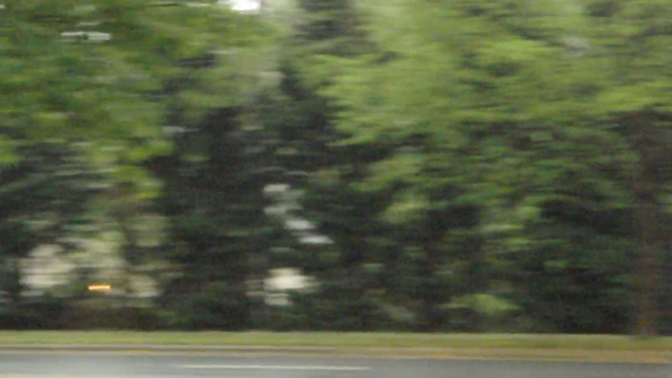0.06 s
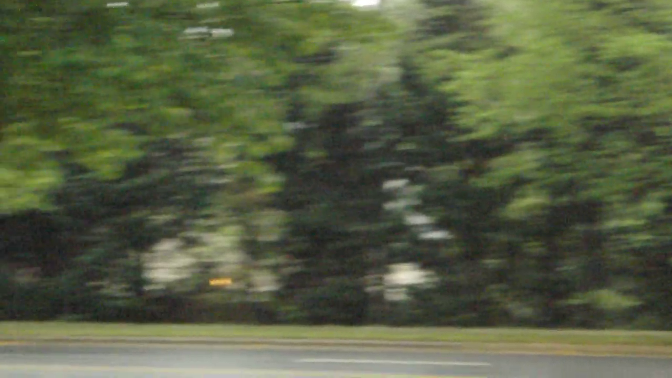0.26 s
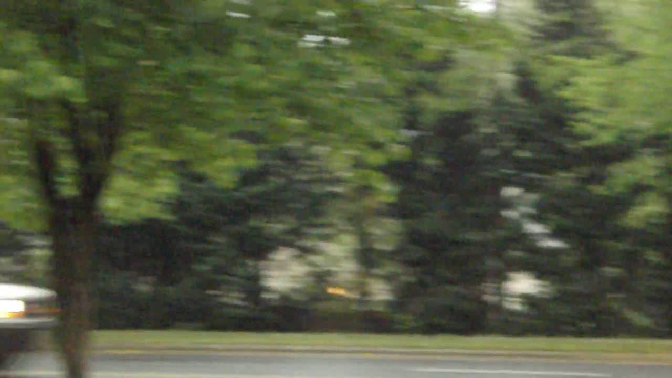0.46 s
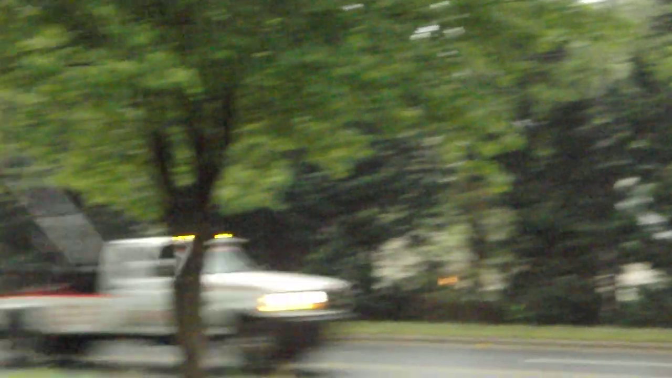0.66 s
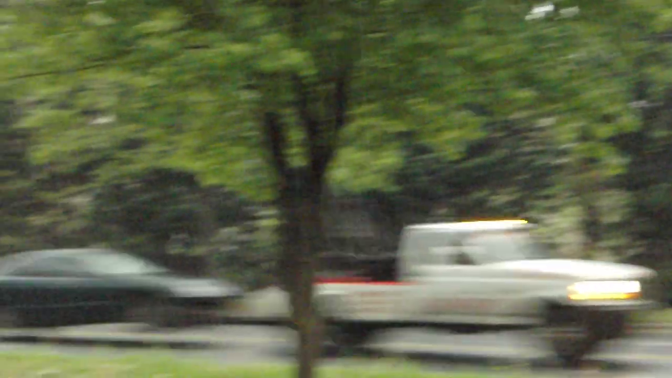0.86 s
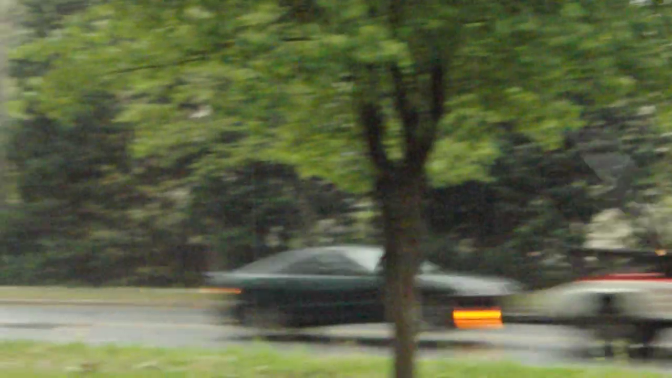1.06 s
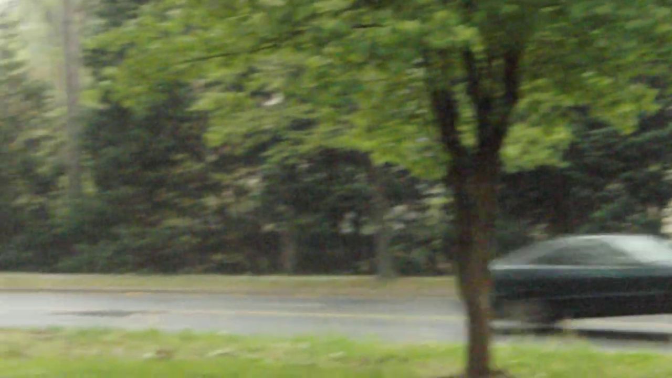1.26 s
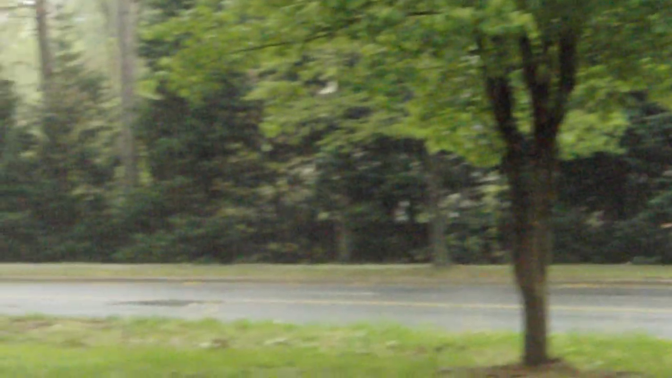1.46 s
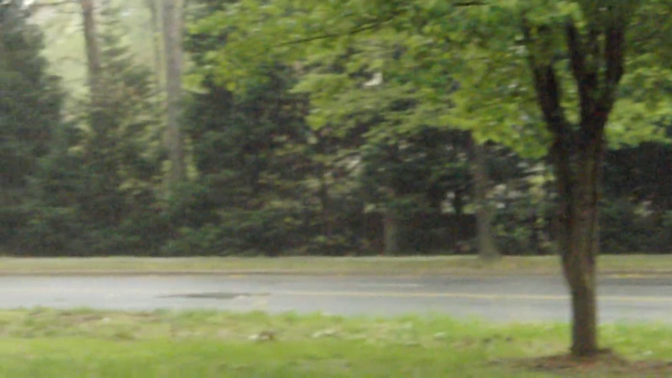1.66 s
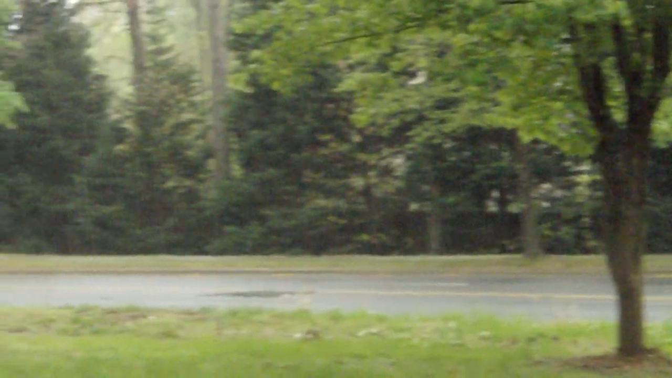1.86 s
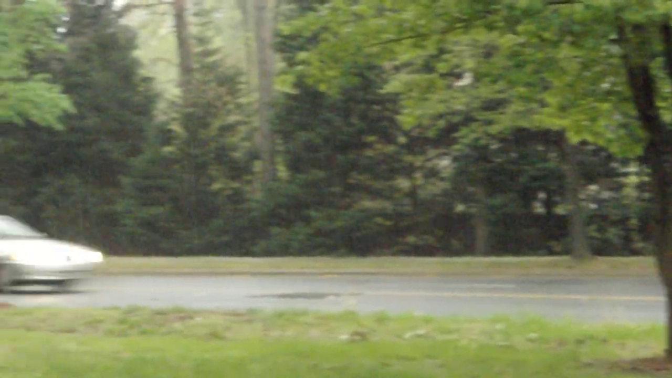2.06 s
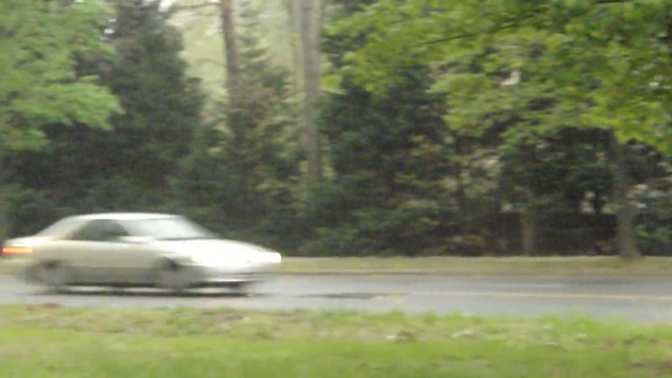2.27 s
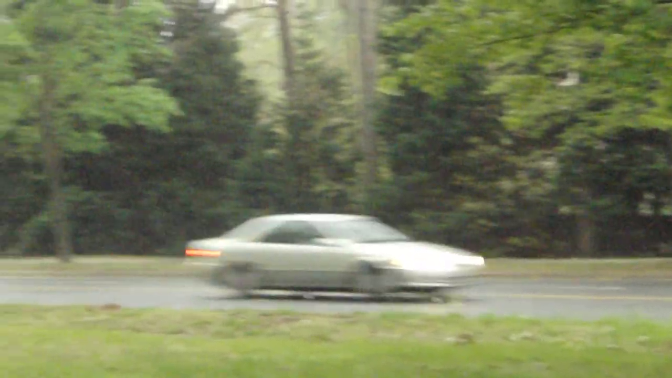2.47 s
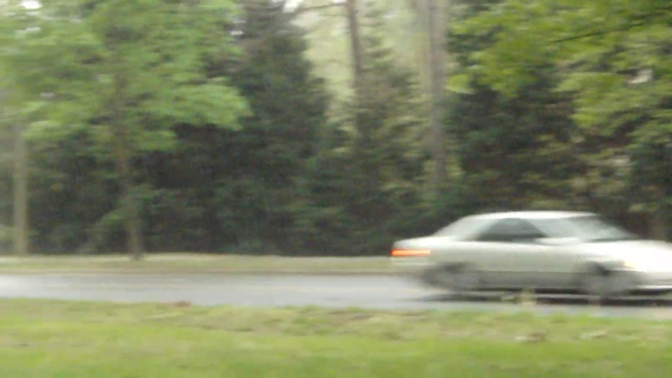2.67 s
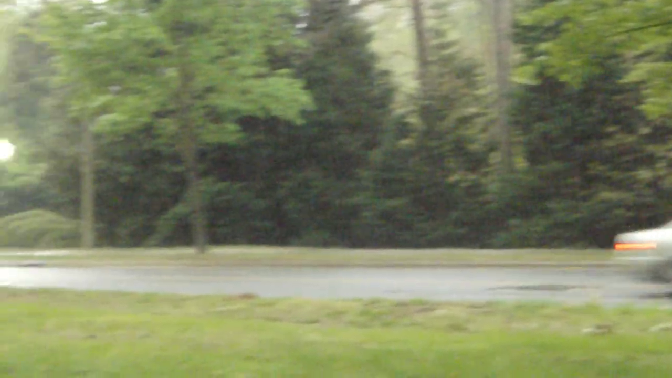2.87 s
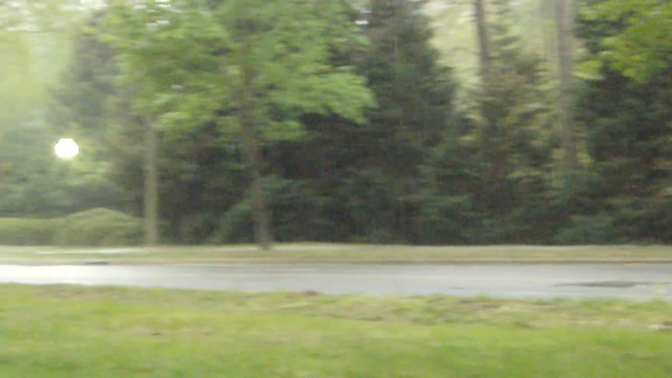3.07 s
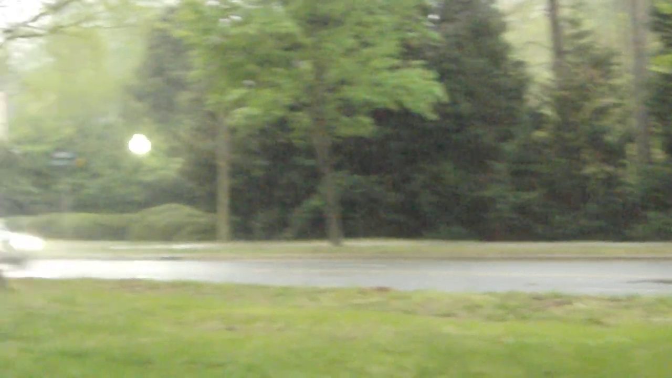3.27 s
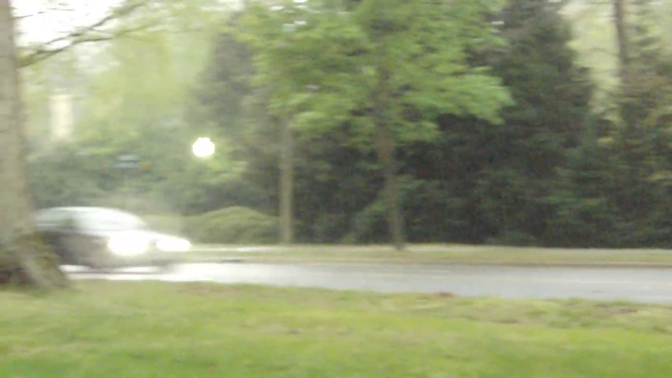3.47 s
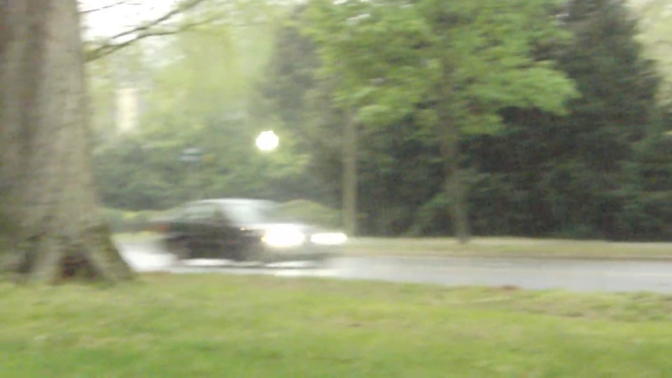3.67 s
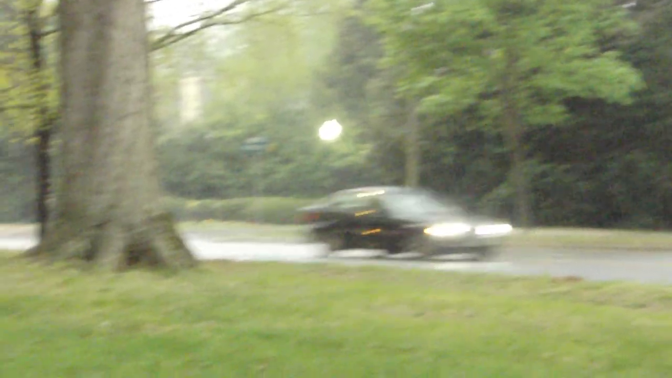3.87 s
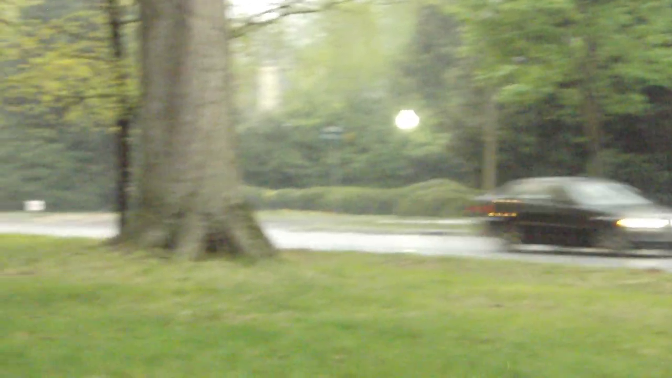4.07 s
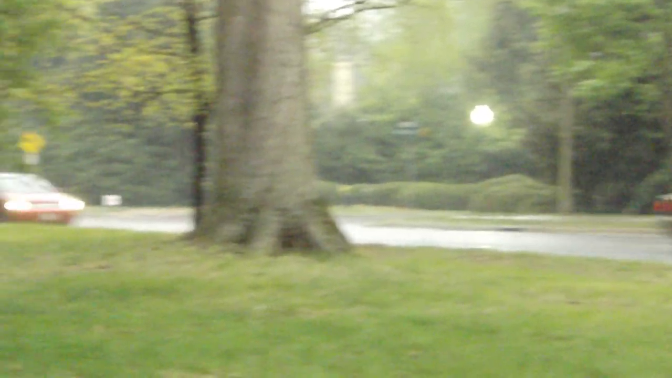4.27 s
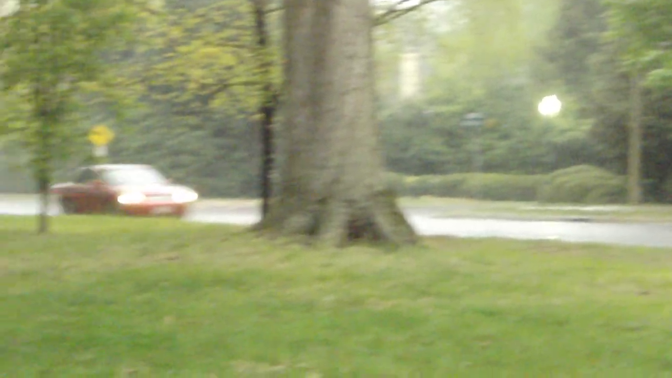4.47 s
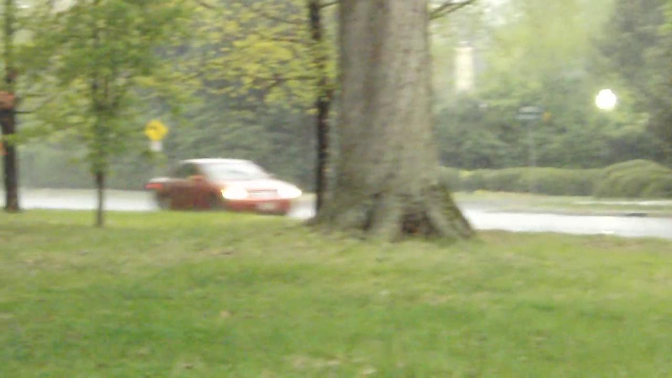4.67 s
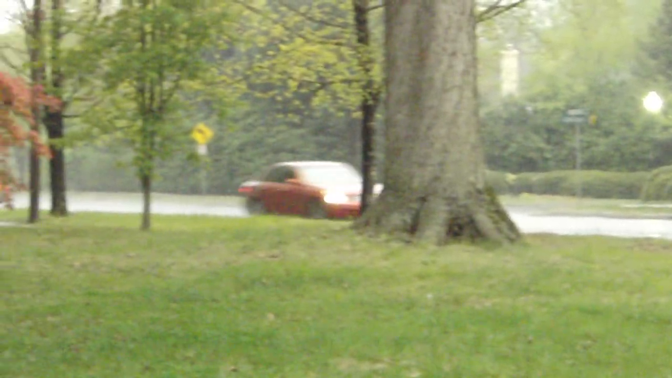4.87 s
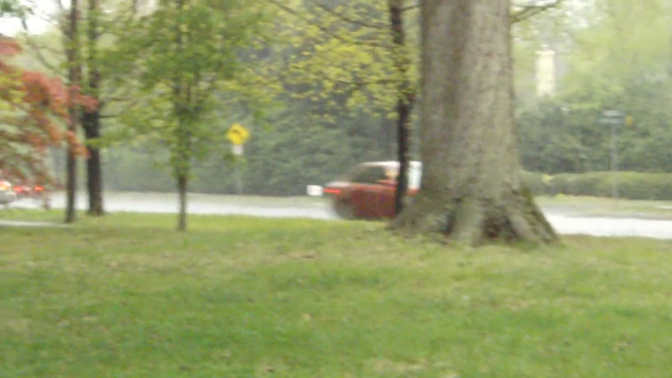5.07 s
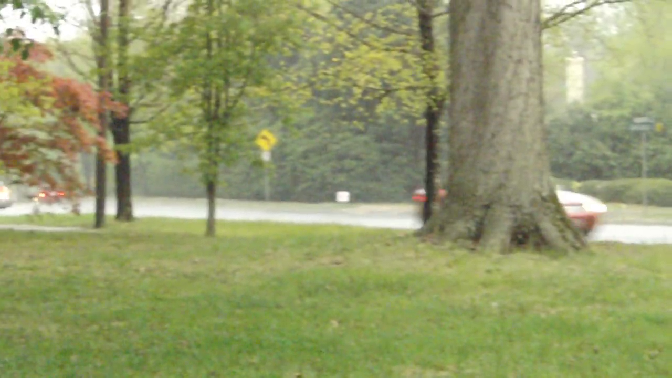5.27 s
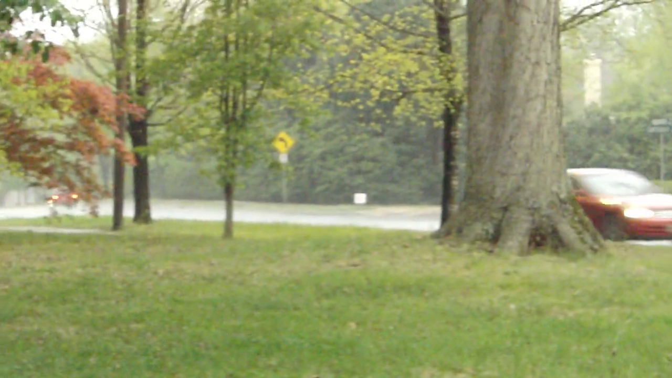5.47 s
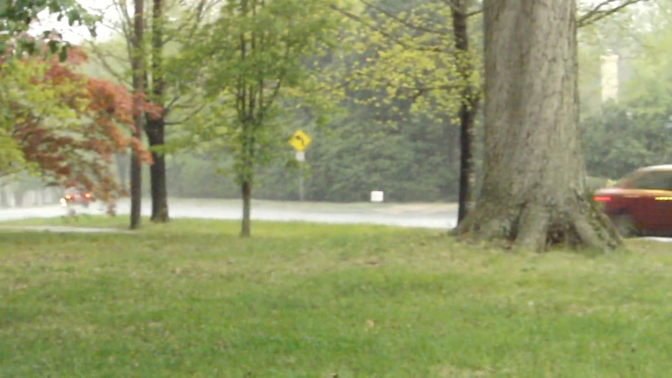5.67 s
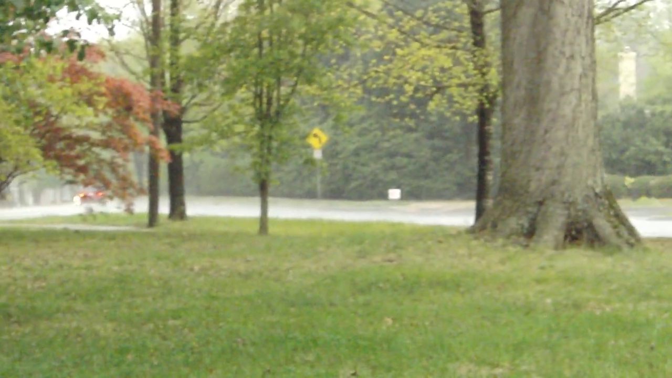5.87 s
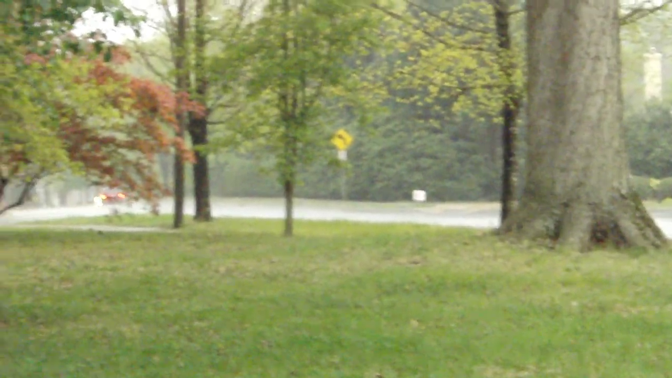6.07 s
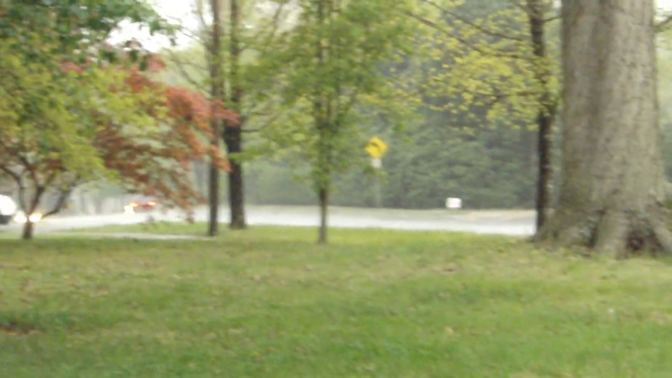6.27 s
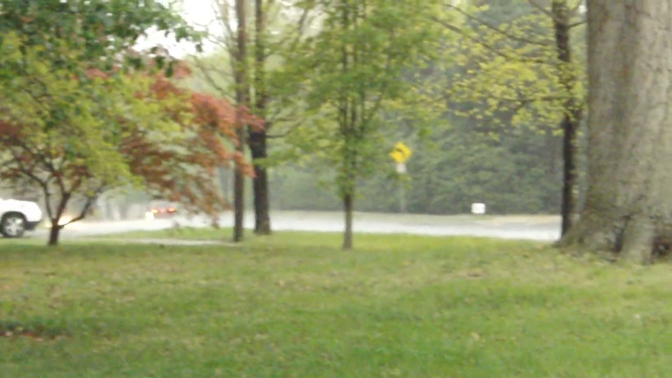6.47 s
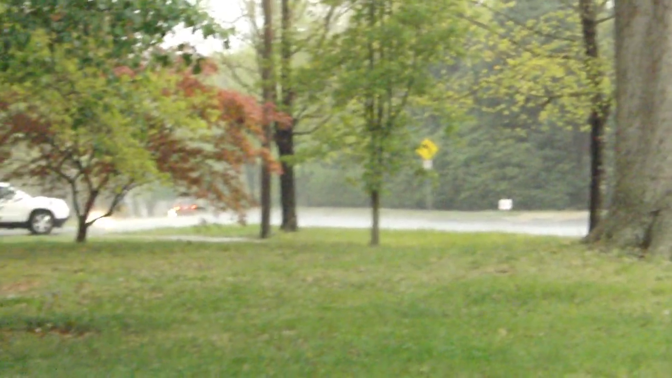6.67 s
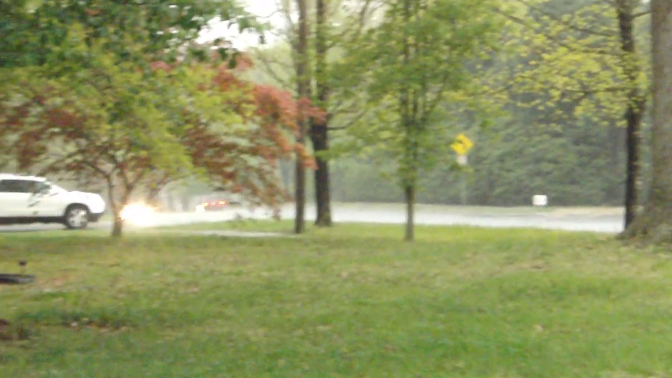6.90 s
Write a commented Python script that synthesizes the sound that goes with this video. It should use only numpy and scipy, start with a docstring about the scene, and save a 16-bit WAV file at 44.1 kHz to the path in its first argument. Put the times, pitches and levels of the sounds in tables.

```python
"""Steady rain by a wet road, with distant traffic, wind and engines rumbling below from the start. Cars pass
one after another as shaped noise: tyre hiss, tread drone, wet whine and thrown spray swell and fade. Small
drops tick throughout on the camera body, a sum of decaying modes; gusts thump the microphone from 0.2 s, larger
drops ring the body from 0.4 s, and a truck's singing tread falls in pitch as it passes near 1.5 s. Near 5.3 s
one big drop pushes the membrane. The treble of it all dips in narrow notches and ends near 15.8 kHz."""
import sys
import numpy as np
from scipy import signal
from scipy.io import wavfile
from scipy.ndimage import uniform_filter1d

SR = 44100
rng = np.random.default_rng(int(sys.argv[2]) if len(sys.argv) > 2 else 0)


def digitize_waveform(pressure):
    """Quantize a signal to 16-bit integers and store it at the path in sys.argv[1].

    Rows of a 2-D input are taken as channels; values are limited to [-1, 1].
    """
    field = np.atleast_2d(pressure).T
    bounded = np.clip(field, -1, 1)
    quanta = np.round(bounded * 32767).astype(np.int16)
    wavfile.write(sys.argv[1], SR, quanta)


N = 305908

# Passing vehicles. Each row: time when nearest in seconds, time to cover its own nearest distance in seconds,
# then levels when nearest: tyre hiss in dB, tread drone in dB, drone centre in Hz, wet-tread whine in dB, spray in dB.
PASSES = [(-.11, 0.97, -36.5, -52, 595, -36.5, -60.5), (.96, .42, -36, -48, 590, -39, -55.5),
          (1.53, 0.28, -30.5, -35, 600, -40, -52.5), (1.92, 0.31, -36, -60, 597, -36.5, -56),
          (2.43, 1.04, -36, -47.5, 884, -61, -78), (3.68, 0.76, -33.5, -46, 717, -41, -58.5),
          (4.6, .57, -38, -58, 725, -58, -64), (5.83, 0.52, -35, -41, 833, -54, -58),
          (6.89, 0.6, -39.5, -50.5, 790, -45, -61)]
# Noise spectra of the road. Each row: frequency in Hz, relative density in dB per Hz.
HISS_COLOUR = [(330, -23), (420, -9), (600, -5), (800, -6), (1100, -1.5), (1620, 1), (2310, -0.5),
               (2800, -2.5), (3550, -3.5), (3900, -10), (5070, -20.5)]
DRONE_COLOUR = [(300, -13), (480, 14), (1000, 9.5), (1500, -4)]
WHINE_COLOUR = [(1900, -7), (2300, -21), (2600, 9.5), (2900, 3), (3400, -1.5), (3900, -25)]
SPRAY_COLOUR = [(3000, -43), (3800, 26.5), (4500, 18), (5200, 15), (5800, 9), (6800, 4), (9000, 2),
                (11500, 0), (14000, 0), (17000, -2)]
FAR_HISS_DB, RAIN_DB, WHINE_FLOOR_DB = -39, -58.5, -70  # steady levels under all passes

# Wind and engine levels. Each row: time in seconds, rumble in dB, deep wind in dB, engine hum in dB.
RUMBLE_LEVELS = [(0.0, -35.5, -42, -53), (0.2, -35, -41, -33.5), (0.45, -38, -55, -40),
                 (1.0, -33.5, -42, -44.5), (1.4, -36, -44, -41), (1.8, -35, -52, -34),
                 (2.1, -36, -56, -36.5), (2.5, -36.5, -44, -35), (3.1, -40, -54, -41),
                 (3.5, -34.5, -40, -39), (3.95, -41.5, -47, -40), (4.2, -39.5, -48, -53),
                 (4.7, -39, -49, -50), (5.3, -41, -46, -59), (5.65, -37.5, -53, -41), (6.05, -43, -57, -47),
                 (6.45, -38.5, -39, -37.5), (6.94, -35.5, -37.5, -50)]
# Noise spectra of the wind. Each row: frequency in Hz, relative density in dB per Hz.
LOW_COLOUR = [(56, -56), (95, -1), (130, -1.5), (184, -0.5), (371, -12), (420, -16.5), (550, -21),
              (920, -120)]
DEEP_COLOUR = [(12, -46), (25, -32), (35, -10), (50, -3.5), (65, -0.5), (78, -2), (100, -38)]
HUM_HZ, HUM_WIDTH_HZ = 86.3, 31

# Modes of the camera body. Each row: frequency in Hz, time to decay by 60 dB in seconds.
SHELL_MODES = [(2950, 0.0042), (3550, 0.0062), (4600, 0.0046), (5250, 0.0017)]
FIZZ_T60_S, FIZZ_RISE_S, RING_RISE_S = 0.0041, 0.00012, 0.00035
# Gusts that thump the microphone. Each row: time of the peak in seconds, peak level in dB, frequency in Hz,
# half-length in seconds.
THUMPS = [(.18, -18, 183, 0.039), (0.196, -25, 70, 0.044), (1.09, -26.5, 147, 0.043),
          (1.261, -25.5, 89, 0.051), (3.466, -30, 200, 0.027)]
# Large drops on the camera. Each row: time in seconds, ring level in dB before doubling and rise,
# centre of the excited modes in Hz, spread over the modes in Hz, fizz level in dB before its rise.
LARGE_DROPS = [(0.4018, -9.5, 4200, 694, -31), (.5781, -30, 4000, 800, -37), (1.0686, -1.5, 4400, 900, -13),
               (1.1623, -29, 4000, 800, -39), (1.3829, -8.5, 3040, 400, -20), (1.94, -13, 4000, 800, -30),
               (2.9754, -30, 4000, 800, -35), (3.2475, -26, 4000, 800, -34), (4.6748, -32, 4000, 800, -32),
               (4.8302, -23, 4800, 600, -35), (4.8423, -5.5, 4040, 700, -20), (5.0274, -15, 4200, 900, -25),
               (5.0697, -28, 4000, 800, -37), (5.3185, -9.5, 4100, 700, -30),
               (5.3444, -7.5, 4860, 600, -24), (5.6055, -26, 4000, 800, -34), (6.1530, -21, 4500, 800, -31),
               (6.7335, -26, 4000, 800, -32), (6.7494, -20, 4600, 700, -41)]

# A truck's singing tread: nearest time, time to cover its nearest distance, level, pitch when nearest
TRUCK_S, TRUCK_REACH_S, TRUCK_DB, TRUCK_HZ = 1.47, 0.26, -40, 580
TRUCK_DOPPLER = 0.08  # largest fractional pitch shift
# One drop that pushes the membrane. The row: time in seconds, peak level in dB, time constant in seconds.
MEMBRANE_PUSH = (5.3456, -13.5, .0005)

# Narrow dips in the treble. Each row: frequency in Hz, width in Hz, depth in dB.
TREBLE_DIPS = [(4028, 800, 14), (6230, 1020, 15), (7810, 600, 14), (10160, 1020, 9.5)]
EDGE_HZ = 15780  # upper band limit


def gain_of(db):
    """Decibel law: amplitude gain is ten to the power dB / 20."""
    return 10 ** (np.asarray(db) / 20)


def evened(x):
    """Power normalisation: scales a signal to rms 1."""
    return x / np.sqrt(np.mean(x ** 2) + 1e-20)


def columns(rows):
    """Linear interpolation: each column after the time becomes a curve with a value at every sample."""
    times, *values = np.transpose(rows)
    return [np.interp(np.arange(N) / SR, times, value) for value in values]


def add(mix, s, sound):
    """Superposition: adds a sound into the mix from time s."""
    part = mix[round(s * SR):][:len(sound)]
    part += sound[:len(part)]


def noise(colour, patchy_db, flicker_db, size, band=(0, SR)):
    """Spectral shaping of random short-time spectra with drifting patches and shared flicker; about rms 1 in band."""
    frames = 4 * N // size + 5
    hz = np.fft.rfftfreq(size, 1 / SR)
    real, imaginary, patches = rng.standard_normal((frames, len(hz), 3)).T
    patches = uniform_filter1d(patches, size=12, axis=0)  # smooth over frequency
    patches = evened(uniform_filter1d(patches, size=9, axis=1))  # smooth over time
    flicker = rng.standard_normal(frames)

    colour_hz, colour_db = np.transpose(colour)
    shape_db = np.interp(np.log(hz + 1), np.log(colour_hz + 1), colour_db, left=-90, right=-90)
    shape = gain_of(shape_db)
    spectra = (real + 1j * imaginary) * shape[:, None]
    spectra = spectra * gain_of(patchy_db * patches + flicker_db * flicker)
    sound = signal.istft(spectra, nperseg=size, noverlap=3 * size // 4)[1][:N]

    in_band = (hz >= band[0]) & (hz < band[1])
    band_share = np.sum(shape[in_band] ** 2) / np.sum(shape ** 2)
    return evened(sound) / np.sqrt(band_share)


def resonate(x, hz, width):
    """Heterodyne resonance: shifts the curve hz to zero, smooths, shifts back; rms 1."""
    turn = np.exp(2j * np.pi * np.cumsum(hz * np.ones(len(x))) / SR)
    r = np.exp(-np.pi * width / SR)
    smooth = signal.lfilter([1], [1, -2 * r, r * r], x / turn)
    return evened((turn * smooth).real)


def approach(near_s, reach_s):
    """Uniform motion: place along the road divided by the nearest distance, at every sample."""
    return (np.arange(N) / SR - near_s) / reach_s


def traffic(nearest_db, floor_db):
    """Addition of powers over a floor; tyres face the roadside, so power falls as distance to the fourth."""
    power = gain_of(2 * floor_db)
    for (near_s, reach_s, *_), db in zip(PASSES, nearest_db):
        distance_squared = 1 + approach(near_s, reach_s) ** 2
        power = power + gain_of(2 * db) / distance_squared ** 2
    return np.sqrt(power)


def tyre_hiss():
    """Broadband radiation of tyres on wet asphalt, over the hiss of distant traffic."""
    hiss_db = np.transpose(PASSES)[2]
    hiss = noise(HISS_COLOUR, patchy_db=0.57, flicker_db=0.5, size=512, band=(1000, 3900))
    return traffic(hiss_db, FAR_HISS_DB) * hiss


def tread_drone():
    """Resonance of noise at the tread's frequency, the vehicles' centres averaged by their power."""
    drone_db, centre_hz = np.transpose(PASSES)[3:5]
    gain = traffic(drone_db, -np.inf)
    weighted = traffic(drone_db + 10 * np.log10(centre_hz), -np.inf)  # power times centre
    drone_hz = (weighted / gain) ** 2
    source = noise(DRONE_COLOUR, patchy_db=0.9, flicker_db=2.0, size=2048)
    return gain * resonate(source, drone_hz, width=430)


def wet_whine():
    """Band-limited noise of wet tread, heard as a whine that follows the distance law."""
    whine_db = np.transpose(PASSES)[5]
    whine = noise(WHINE_COLOUR, patchy_db=1.6, flicker_db=2.5, size=512)
    return traffic(whine_db, WHINE_FLOOR_DB) * whine


def spray_and_rain():
    """Incoherent addition: thrown spray and steady rain share one fine treble noise."""
    spray_db = np.transpose(PASSES)[6]
    spray = noise(SPRAY_COLOUR, patchy_db=0.5, flicker_db=1.6, size=256, band=(6500, 15500))
    return traffic(spray_db, RAIN_DB) * spray


def wind_and_engines():
    """Low-frequency noise of lumpy wind, and noise through a narrow resonance as a wavering engine hum."""
    low_db, deep_db, hum_db = columns(RUMBLE_LEVELS)
    low = noise(LOW_COLOUR, patchy_db=2.0, flicker_db=0.0, size=4096, band=(100, 350))
    deep = noise(DEEP_COLOUR, patchy_db=2.0, flicker_db=0.5, size=4096)
    hum = resonate(rng.standard_normal(N), HUM_HZ, HUM_WIDTH_HZ)
    return gain_of(low_db) * low + gain_of(deep_db) * deep + gain_of(hum_db) * hum


def drop(ring_db, centre_hz, spread_hz, fizz_db, splash):
    """Modal excitation: a splash fizzes at once, while the shell's decaying modes build up behind it."""
    t = np.arange(len(splash)) / SR
    hz, t60 = np.transpose(SHELL_MODES)[:, :, None]
    share = np.exp(-0.5 * ((hz - centre_hz) / spread_hz) ** 2)
    modes = share * gain_of(-60 * t / t60) * np.sin(2 * np.pi * hz * t)
    ring = np.sum(modes, axis=0) / share.sum()
    ring = 2 * gain_of(ring_db) * (1 - np.exp(-t / RING_RISE_S)) * ring

    bright = evened(signal.lfilter([1, -1.5, 0.7], [1], splash))  # favours the treble
    fizz = gain_of(fizz_db - 60 * t / FIZZ_T60_S) * bright
    return ring + (1 - np.exp(-t / FIZZ_RISE_S)) * fizz


def small_drops(per_s=45, smallest_db=-50, spread_db=4):
    """Poisson-like arrivals of random size, each striking one of eight spots with its own modal balance."""
    excess = np.minimum(rng.exponential(size=N), 4)
    arrivals = rng.random(N) < per_s / SR
    sizes = gain_of(smallest_db + spread_db * excess) * arrivals
    spot = rng.integers(0, 8, N)
    out = np.zeros(N)
    for k, centre_hz in enumerate(np.linspace(3200, 5000, num=8)):
        tick = drop(0, centre_hz, 800, -11, rng.standard_normal(900))
        out += signal.oaconvolve(sizes * (spot == k), tick)[:N]
    return out


def gust_thumps():
    """Pressure pulses of gusts on the microphone: cosines under Gaussian envelopes."""
    out = np.zeros(N)
    for s, db, hz, half_s in THUMPS:
        t = np.arange(-half_s, half_s, 1 / SR)
        envelope = np.exp(-8 * (t / half_s) ** 2)
        add(out, s - half_s, gain_of(db) * envelope * np.cos(2 * np.pi * hz * t))
    return out


def large_drops():
    """Impact response: each large drop excites the camera body's modes and a fresh splash."""
    out = np.zeros(N)
    for s, *strike in LARGE_DROPS:
        add(out, s, drop(*strike, rng.standard_normal(900)))
    return out


def truck_sing():
    """Doppler effect: a narrow tread tone falls in pitch as the truck passes."""
    along = approach(TRUCK_S, TRUCK_REACH_S)
    radial = along / np.sqrt(1 + along ** 2)  # share of the motion that recedes
    sing_hz = TRUCK_HZ * (1 - TRUCK_DOPPLER * radial)
    tone = resonate(rng.standard_normal(N), sing_hz, width=13)
    return gain_of(TRUCK_DB) / (1 + along ** 2) * tone


def membrane_push():
    """Damped displacement: one drop drives the membrane inward, followed by a slow rebound."""
    out = np.zeros(N)
    s, db, time_constant = MEMBRANE_PUSH
    u = np.arange(900) / SR / time_constant
    pulse = u ** 2 * (3 - u) * np.exp(-u) / 0.78  # peak close to 1
    add(out, s, -gain_of(db) * pulse)
    return out


def scene():
    """Superposition of road, wind and drops at one microphone."""
    road = tyre_hiss() + tread_drone() + wet_whine() + spray_and_rain() + truck_sing()
    wind = wind_and_engines() + gust_thumps()
    drops = small_drops() + large_drops() + membrane_push()
    return (road + wind + drops)[None]


def record(dry):
    """Pole-zero notches for the treble dips, then a linear-phase band limit."""
    out = dry
    for hz, width, depth_db in TREBLE_DIPS:
        pole = np.exp(-np.pi * width / SR)
        zero = np.exp(-np.pi * width * gain_of(-depth_db) / SR)  # nearer the unit circle than the pole
        c = -2 * np.cos(2 * np.pi * hz / SR)
        out = signal.lfilter([1, c * zero, zero ** 2], [1, c * pole, pole ** 2], out)
        out = out * (1 + pole) / (1 + zero)
    band_limit = signal.firwin(1023, EDGE_HZ, window=("kaiser", 9), fs=SR)
    return signal.oaconvolve(out, band_limit[None], "same")


dry = scene()
out = record(dry)
digitize_waveform(out)
```